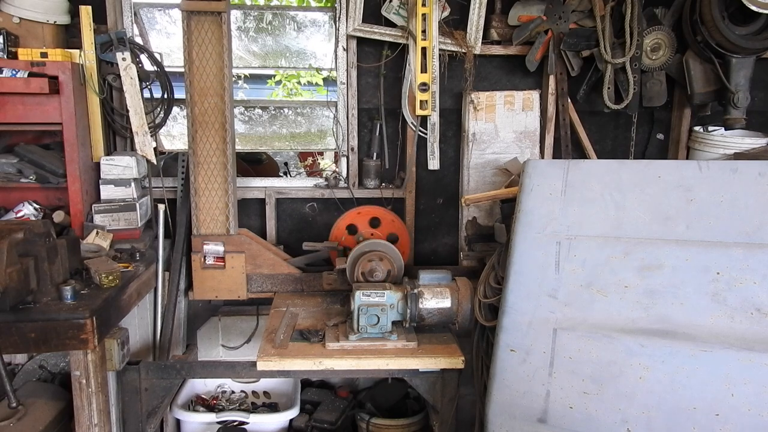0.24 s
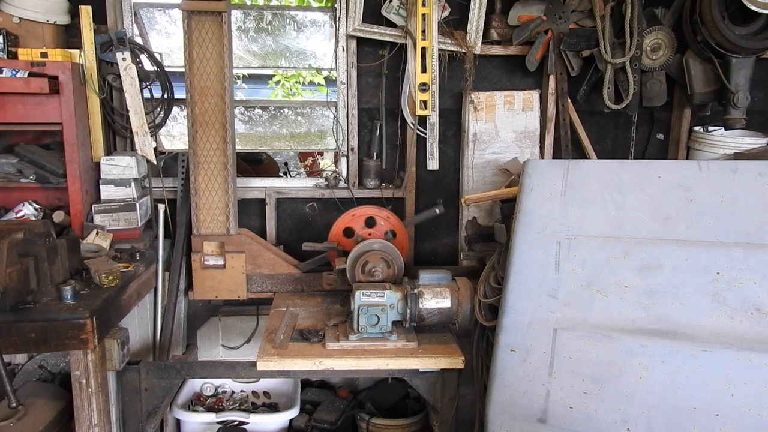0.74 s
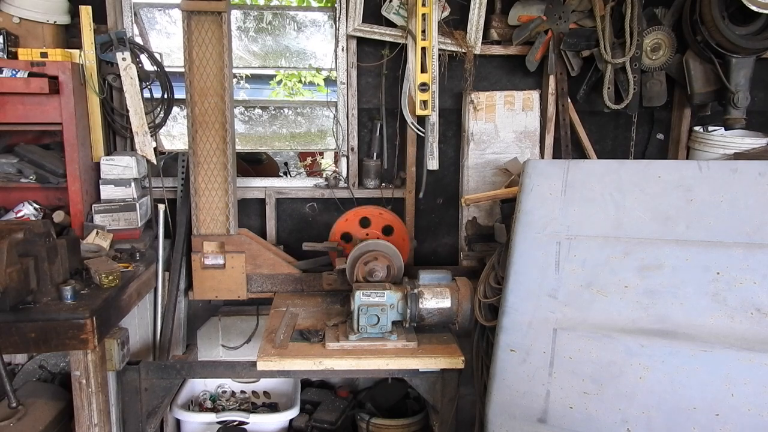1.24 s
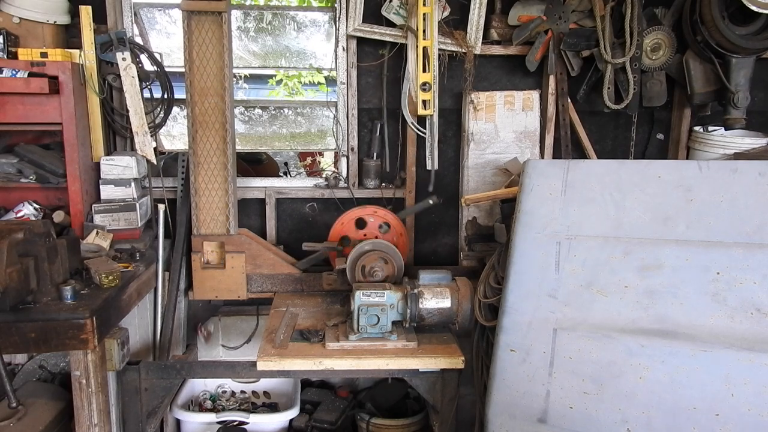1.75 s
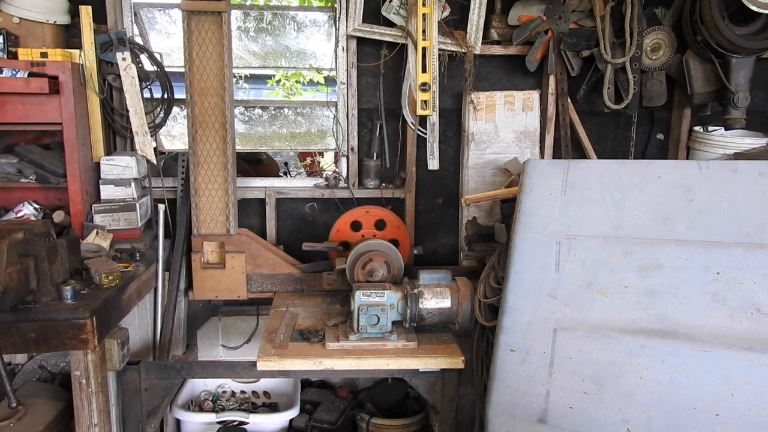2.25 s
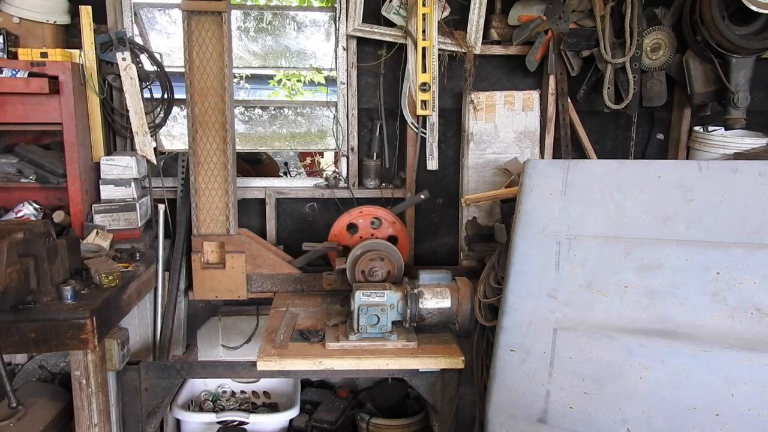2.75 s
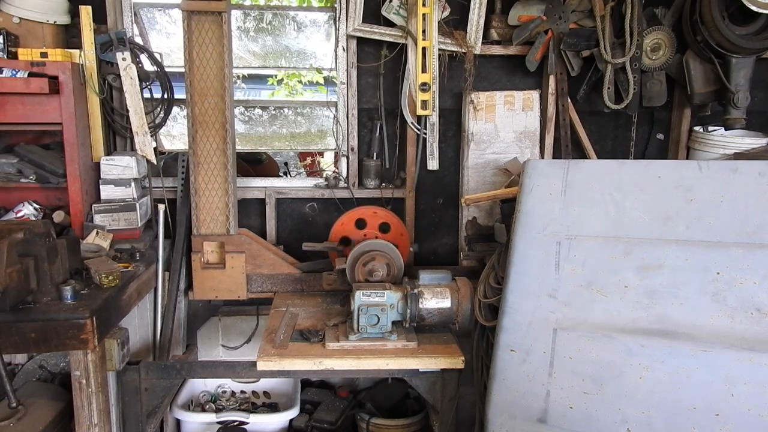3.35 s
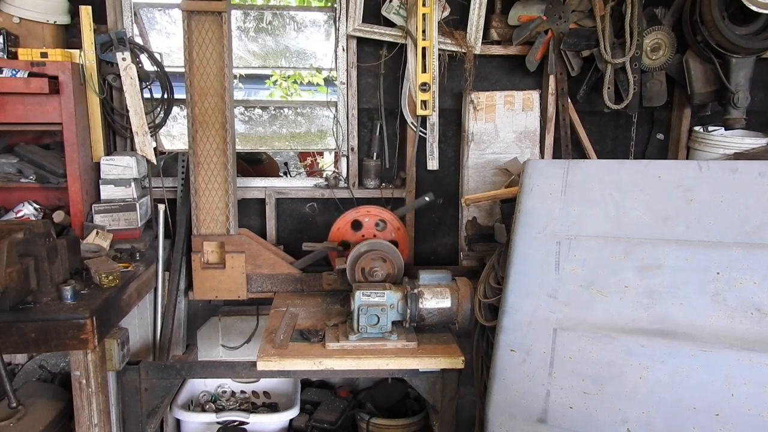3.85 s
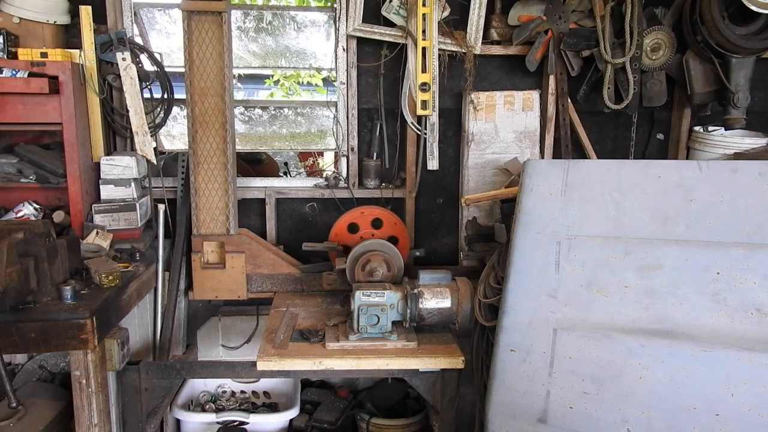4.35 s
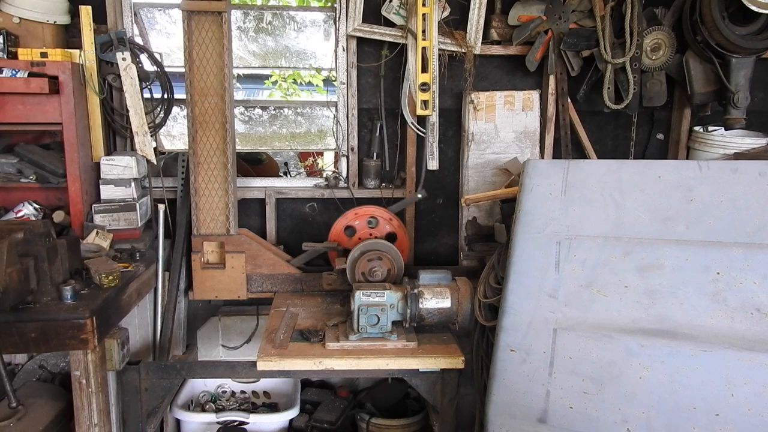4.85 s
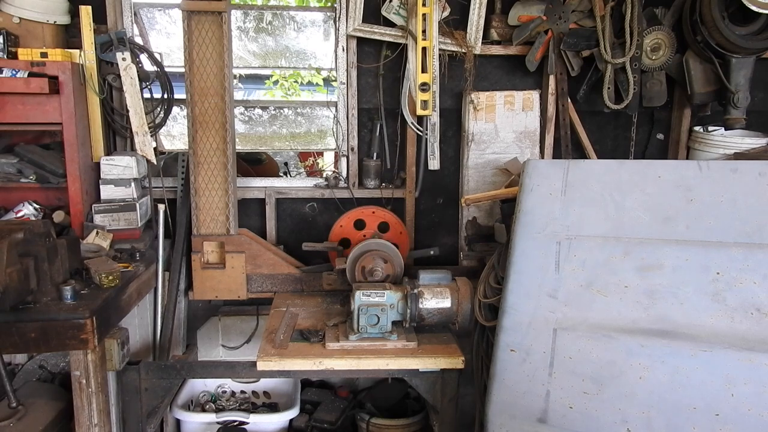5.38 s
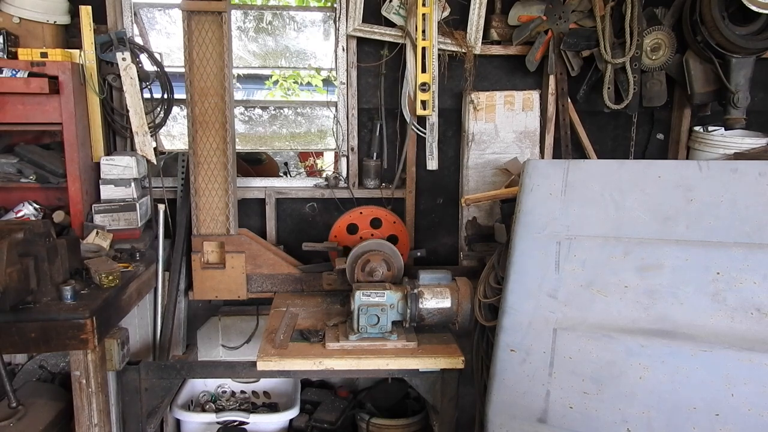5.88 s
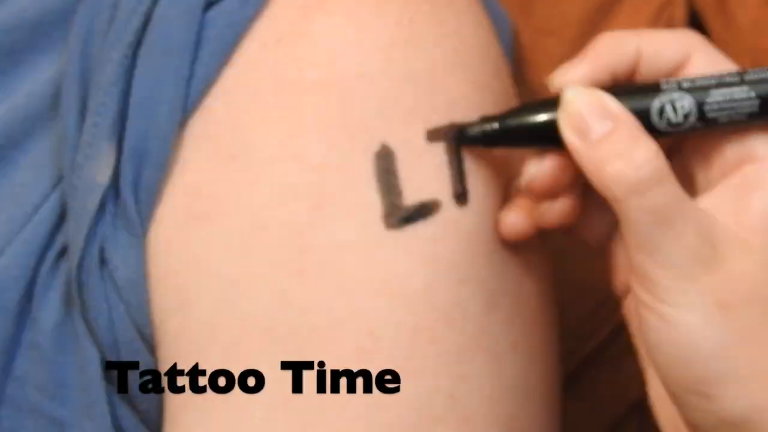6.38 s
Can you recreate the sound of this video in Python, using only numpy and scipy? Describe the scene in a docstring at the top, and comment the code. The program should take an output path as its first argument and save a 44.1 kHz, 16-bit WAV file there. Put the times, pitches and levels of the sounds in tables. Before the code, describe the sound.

Close up in a small workshop, the electric motor of a can crusher hums and whines, its gear noise rising and falling. Empty drink cans tumble down the feed chute with loud, dense knocks, rattles, squeals and a few hollow hoots. The clatter then thins to single cans crunching and dropping. The motor is cut, a last few cans clatter, and the sound fades.

```python
"""A small workshop, close to a motor-driven can crusher, heard as on a mid-side microphone pair.
From the start the motor hums and whines and the ram slides out and back, while empty drink cans tumble
down the feed chute, knocking, rattling and squealing; around 2 s the air in them hoots hollowly.
After 3 s single cans crunch and drop. At 5.1 s the motor is cut, a last few cans clatter, and at 6 s
the scene fades out. Every source has two rows, mid and side."""
import sys
import numpy as np
from scipy import signal
from scipy.fft import rfft, irfft
from scipy.io import wavfile
from scipy.ndimage import uniform_filter1d, minimum_filter1d

SR = 44100
rng = np.random.default_rng(int(sys.argv[2]) if len(sys.argv) > 2 else 0)


def log_audio(samples):
    """Write samples as a 16-bit WAV file to the path given in sys.argv[1]."""
    # one column per channel
    frames = np.atleast_2d(samples).T
    # limit to full scale, then quantise
    limited = np.clip(frames, -1, 1)
    pcm = np.round(limited * 32767).astype(np.int16)
    wavfile.write(sys.argv[1], SR, pcm)


N = 291930
TIME = np.arange(N) / SR

# reverberation of the workshop: f/Hz, t60/s
ROOM_DECAY = [(120, 0.36), (500, 0.41), (2000, 0.4), (6500, 0.31), (12000, 0.31)]
# side against mid at the microphone: f/Hz, relative level/dB
STEREO_WIDTH = [(30, -18), (60, -31.5), (125, -32), (250, -35.5), (500, -29), (1000, -17.5), (2000, -15.5),
                (4000, -11), (8000, 0), (14000, -3)]
# the treble leans to the right: f/Hz, left minus right/dB
STEREO_LEAN = [(500, 0), (1000, -0.25), (4000, -1), (8000, -.3)]
# output fader, a brief lift and then the close: t/s, gain/dB
FADER = [(5.7, -6), (5.85, -3), (5.93, -9), (5.99, -14.5), (6.01, -75), (6.1, -110)]

# spectrum of gear and belt noise: f/Hz, relative level/dB
GEAR_SPECTRUM = [(15, -51), (25, -36), (60, -19.5), (105, -6.5), (190, -7), (300, -6), (570, -5.5),
                 (850, -10), (1300, -9.5), (1500, -4.5), (1650, -16.5), (1850, -12), (2350, -17),
                 (3900, -20.5), (6700, -12), (8500, -30), (11000, -43), (16000, -62.5)]
# rotor slot tones: multiple of the shaft speed, multiple of the magnetic pull added to it, level/dB
SLOT_TONES = [(48, -2, -39.5), (48, -1, -41.5), (47, 0, -33.5), (48, 0, -33.5), (49, 0, -33.5),
              (50, 0, -39), (48, 1, -30.5), (48, 2, -44.5), (43, 0, -40)]
# hum of the motor frame: f/Hz, level/dB
FRAME_HUM = [(119.5, -40.5), (253, -44.5), (436, -45), (533, -50.5)]
SHAFT_HZ, MAGNET_HZ = 29.64, 120
CRANK_TURN_S, RAM_AT_REST_S = 1.152, 4.105  # one stroke out and back; a moment at the end of a stroke
CUT_S, FIELD_DB_PER_S = 5.1, 132.5  # the switch is thrown and the motor's field dies

# the air inside a can hoots: middle t/s, length/s, f/Hz, level/dB
AIR_HOOTS = [(1.812, 0.025, 546, -7.5), (1.879, .06, 680, -13), (1.953, 0.036, 694, -13.5),
             (1.99, .024, 714, -14.5), (2.236, .035, 733, -11), (2.294, 0.035, 710, -18),
             (2.326, 0.028, 462, -10.5), (2.969, 0.024, 542, -8.5)]
# metal rubs on metal: start t/s, end t/s, start f/Hz, end f/Hz, relative level/dB
RUB_SQUEALS = [(0, 0.028, 647, 640, -21), (0.275, 0.424, 661, 659, -18.5), (0.789, 1.028, 590, 575, -17.5),
               (0.791, 1.027, 315.6, 303.4, -21.5), (0.962, 1.135, 638, 662, -15.5),
               (1.381, 1.557, 631, 565, -21), (1.414, 1.53, 1193, 1174, -24),
               (1.416, 1.533, 5410, 5910, -13.5)]
# a wall or lid rings on one note: t/s, f/Hz, relative level/dB, t60/s
WALL_RINGS = [(0.08, 442, -8.5, 0.11), (0.1, 2550, -14.5, 0.55), (0.479, 170, -13, 0.37),
              (0.626, 245, -15.5, 0.34), (1.413, 431.4, -14, 0.22), (1.574, 5700, -13, 0.15),
              (1.605, 295, -14, 0.21), (1.721, 1025, -14.5, 0.1), (1.85, 5706, -9, .1),
              (1.856, 1716, -17, 0.37), (1.873, 3230, -13.5, 0.22), (2.01, 1283, -14, 0.32),
              (2.088, 1800, -16, 0.2), (2.225, 445, -13.5, 0.083), (2.316, 467, -15.5, 0.074),
              (2.412, 1353, -10, .15), (2.68, 247, -17, 0.3), (2.685, 539, -14, 0.19),
              (2.688, 1325, -13, 0.14), (2.901, 6660, -11, 0.19), (4.172, 6220, -11, 0.17),
              (4.174, 1860, -13, 0.081), (5.188, 1851, -27.5, 0.13), (5.26, 1875, -21, 0.17),
              (5.262, 6440, -10, 0.17), (5.413, 6460, -20, .1), (5.579, 4420, -17, 0.15)]
# a dent pops through: t/s, f/Hz, relative level/dB
DENT_POPS = [(0.0812, 624, -1), (0.0946, 2800, -9), (0.0982, 800, -5), (0.1004, 3350, -0.5),
             (1.112, 4200, -4.5), (1.1603, 880, -3.5), (1.1705, 1300, -6.5), (1.603, 1300, -1),
             (1.643, 1200, -9.5), (1.6947, 900, 1), (2.01, 6420, -5), (2.197, 6200, -4.5),
             (2.611, 6060, 5.5), (2.699, 1300, -4.5), (3.1892, 910, 3), (3.1948, 6600, -6),
             (3.315, 6400, 1.5), (3.349, 5500, -8.5)]
# spectrum of the clatter: f/Hz, relative level/dB
CLATTER_SPECTRUM = [(29, -53), (50, -36.5), (131, -12.5), (284, 2), (483, -2.5), (532, 1), (765, 0),
                    (1210, 2.5), (1820, -2), (2380, -10), (3580, -7), (3950, -12.5), (6390, -9.5),
                    (7210, -11), (16000, -55)]
# resonances of chute and cans: f/Hz, width/Hz, lift/dB
CAN_RESONANCES = [(164, 15.1, 10), (245.5, 14, 0.5), (299.4, 38, 2), (423, 28, 4), (532, 40, 4),
                  (656, 47, 6.5), (1060, 19, 3.5), (1219, 75, 1.5), (2050, 51, 0), (3176, 70, -5),
                  (5670, 98, 1), (6464, 1200, 5)]
REGISTER_EDGES_HZ = [400, 2200, 4800]  # between thud, clank, crack and jingle
# a can tumbles or crumples: start t/s, swell/s, hold/s, chute thud/dB, wall clank/dB, rim jingle/dB
CAN_CRUNCHES = [(0.091, 0.028, 0.19, -22.5, -12.5, -11), (0.45, 0.044, 0.12, -17.5, -12.5, -16),
                (0.773, 0.0082, 0.22, -27.5, -13.5, -15.5), (1.149, 0.0087, 0.29, -25, -14.5, -13),
                (1.553, 0.04, .15, -20.5, -13, -17.5), (1.849, .01, 0.16, -40.5, -22, -21),
                (2.01, 0.028, 0.086, -25.5, -14.5, -17), (2.188, 0.0067, 0.12, -30.5, -14.5, -13.5),
                (2.337, 0.0092, 0.12, -37.5, -16.5, -14.5), (2.602, 0.054, 0.14, -23, -12, -18.5),
                (3.104, .01, 0.019, -21.5, -23.5, -21.5), (3.194, .01, .045, -31.5, -18.5, -16),
                (3.308, .01, 0.087, -36, -24.5, -19), (3.604, 0.078, 0.0041, -21.5, -12.5, -20),
                (4.149, 0.029, 0.004, -18.5, -17, -15), (4.681, 0.056, 0.0067, -21.5, -14.5, -23.5),
                (4.848, 0.041, 0.058, -38, -29, -33.5), (5.175, .02, 0.051, -33, -35, -38.5),
                (5.251, .01, .005, -31.5, -26, -20.5), (5.415, 0.019, 0.12, -38.5, -37.5, -39),
                (5.544, 0.058, 0.011, -22, -16.5, -14.5)]
# single knocks of a can: t/s, wall clank/dB, crack/dB, rim jingle/dB, t60/s
CAN_KNOCKS = [(0.079, -9, -26.5, -11.5, .07), (0.091, -6, -5, -11, .05), (0.428, -19, -47, -17.5, .14),
              (0.475, -6.5, -25, -2, 0.071), (0.606, -9, -16, -23.5, .14), (0.783, -12, -17, -2.5, .07),
              (1.11, -23.5, -17.5, -12.5, .08), (1.158, -2, -15.5, -14.5, .09),
              (1.394, -15, -28.5, -19, .12), (1.407, -12, -30, -8, .08), (1.546, -18, -22.5, -6.5, 0.15),
              (1.576, -30, -18, -9.5, .06), (1.602, -6.5, -11.5, -22, .07), (1.641, -9, -13, -20, .08),
              (1.691, -9, -7.5, -22, .09), (1.848, -22, -6.5, -4, .09), (2.006, -14.5, -14, -8, .12),
              (2.192, -13, -16, -8.5, .1), (2.229, -4.5, -16.5, -9, 0.044), (2.329, -12, -18.5, -11, .09),
              (2.403, -9.5, -8, -21.5, .05), (2.491, -18.5, -18.5, -11.5, .09),
              (2.611, -9.5, -17, -1.5, .08), (2.642, -13.5, -28, -10, .1), (2.696, -8.5, -16.5, -20, .08),
              (2.76, -7.5, -10, -25, .14), (2.895, -23, -13.5, -11, .11), (3.061, -24.5, -27, -28, .14),
              (3.112, -14.5, -32, -25.5, .07), (3.134, -24, -25, -15, .16), (3.188, -8.5, -12.5, -3, .045),
              (3.312, -31.5, -17, -8.5, .07), (3.347, -30, -22.5, -18.5, .07),
              (3.692, -9.5, -12.5, -11.5, .12), (3.974, -13.5, -23, -38, 0.13),
              (4.124, -24.5, -28.5, -22.5, .17), (4.161, -23, -32.5, -18, .12),
              (4.181, -11.5, -25.5, -11, .12), (4.694, -24.5, -33.5, -16, .1), (4.717, -20, -30, -9, 0.059),
              (4.75, -8.5, -22.5, -23.5, .09), (4.926, -12.5, -20, -25, .12), (5.039, -31, -50, -19, 0.052),
              (5.171, -42, -28.5, -25, 0.046), (5.19, -25, -32.5, -34, 0.19),
              (5.26, -15.5, -26.5, -6, 0.071), (5.412, -40, -55, -29.5, .09), (5.585, -34, -37, -16.5, .2),
              (5.622, -8, -13, -25, .07), (5.821, -34, -32, -38.5, .11)]


def amp(db):
    """Decibels to gain."""
    return 10 ** (np.asarray(db) / 20)


def unit_rms(x):
    """Scaled to rms 1."""
    return x / np.sqrt(np.mean(x ** 2) + 1e-20)


def read(points, hz):
    """A table's value on a log-frequency axis."""
    f, value = np.transpose(points)
    return np.interp(np.log(hz + 1), np.log(f + 1), value)


def add(mix, s, sound):
    """Mixes a sound in at time s."""
    part = mix[:, max(round(s * SR), 0):][:, :sound.shape[1]]
    part += sound[:, :part.shape[1]]


def wander(rate_hz):
    """Slow random motion of rms 1."""
    hz = np.fft.rfftfreq(N, 1 / SR)
    return unit_rms(irfft(rfft(rng.standard_normal(N)) * np.exp(-(hz / rate_hz) ** 2), N))


def causal(gain, size=4096):
    """The minimum-phase response with this spectral shape, of energy 1."""
    log_gain = np.log(np.maximum(np.r_[gain, gain[-2:0:-1]] / gain.max(), 1e-5))
    taps = np.fft.ifft(np.exp(np.conj(signal.hilbert(log_gain)))).real[:size]
    return taps / np.linalg.norm(taps)


def through(x, taps):
    """Convolves each channel, keeping the length."""
    return signal.fftconvolve(x, np.atleast_2d(taps), axes=1)[:, :x.shape[1]]


def workshop(x, gap_s=0.0035):
    """Dense reflections from near, cluttered walls, each band dying at its own speed."""
    hz, t, bands = signal.stft(rng.standard_normal((2, SR // 2)), SR, nperseg=256)
    tail = signal.istft(bands * amp(-60 * t / read(ROOM_DECAY, hz)[:, None]), SR, nperseg=256)[1]
    tail *= np.clip(np.arange(tail.shape[1]) / SR / gap_s - 1, 0, 1)
    return through(x[[0, 0]], tail / np.linalg.norm(tail[0]))


def motor_drive():
    """1 while the motor is powered, falling to 0 after the cut."""
    return amp(-FIELD_DB_PER_S * np.maximum(TIME - CUT_S, 0))


def gears(rest_db=-28.5, slide_db=6.5, throb=0.17, flutter_db=0.1, unpowered_db=-8, coast_db_per_s=-5):
    """Gear teeth and belt rub, harder once a turn; loudest while the ram slides fastest."""
    ram_speed = abs(np.sin(2 * np.pi * (TIME - RAM_AT_REST_S) / CRANK_TURN_S))
    coasting_db = unpowered_db * (1 - motor_drive()) + coast_db_per_s * np.maximum(TIME - CUT_S, 0)
    rub = rng.standard_normal((2, N)) * (1 + throb * np.cos(2 * np.pi * SHAFT_HZ * TIME))
    rub *= amp(flutter_db * wander(32))
    colour = causal(amp(read(GEAR_SPECTRUM, np.fft.rfftfreq(8192, 1 / SR))))
    return amp(rest_db + slide_db * ram_speed + coasting_db) * unit_rms(through(rub, colour))


def motor(drift_hz=0.011, whine_waver_db=2, hum_waver_db=5, coast_hz=105, coast_db=-48):
    """Rotor slots whine in a cluster that beats once a turn; the frame hums, lower after the cut."""
    drive = motor_drive()
    turns = np.cumsum(SHAFT_HZ + drift_hz * wander(0.91)) / SR
    whine = hum = 0
    for per_turn, per_pull, db in SLOT_TONES:
        cycles = per_turn * turns + per_pull * MAGNET_HZ * TIME
        whine += amp(db + whine_waver_db * wander(6.3)) * np.cos(2 * np.pi * cycles)
    for hz, db in FRAME_HUM:
        hum += amp(db + hum_waver_db * wander(11)) * np.sin(2 * np.pi * hz * TIME + 0.55 * wander(9.3))
    coast = amp(coast_db + 3 * wander(9)) * np.sin(2 * np.pi * coast_hz * TIME + 0.63 * wander(6))
    return np.sqrt(2) * np.outer([1, .5], drive * (whine + hum) + (1 - drive) * coast)


def hoots():
    """The air in a can rings briefly through its opening, dead centre."""
    out = np.zeros((2, N))
    for s, length, hz, db in AIR_HOOTS:
        t = np.arange(0, length, 1 / SR)
        swell = amp(db) * np.sqrt(2) * np.sin(np.pi * t / length) ** 2
        add(out, s - length / 2, np.outer([1, 0], swell * np.sin(2 * np.pi * hz * t)))
    return out


def squeals(gain_db=-1, jitter=0.026, rough_db=4):
    """Uneven slipping keeps one resonance sounding, with a shaky pitch."""
    out, shake, grip = np.zeros((2, N)), wander(90), wander(60)
    for start, end, hz_from, hz_to, db in RUB_SQUEALS:
        on = (TIME >= start) & (TIME < end)
        cycles = np.cumsum(np.linspace(hz_from, hz_to, on.sum()) * (1 + jitter * shake[on])) / SR
        level = amp(gain_db + db + rough_db * grip[on]) * signal.windows.tukey(on.sum(), .4)
        out[:, on] += level * np.sin(2 * np.pi * (cycles + rng.random((2, 1))))
    return out


def rings(gain_db=3, split=0.015, rise_s=0.0013, flex=0.01014):
    """A dented can splits each note into a close pair that beats as it dies; flexing shakes the pitch."""
    out, t, shake = np.zeros((2, N)), np.arange(SR // 3) / SR, wander(70)
    for s, hz, db, t60 in WALL_RINGS:
        phase = rng.random((2, 2, 1))
        cycles = np.cumsum(hz * (1 + flex * np.interp(s + t, TIME, shake))) / SR
        lower = np.sin(2 * np.pi * (cycles + phase[0]))
        upper = .5 * np.sin(2 * np.pi * ((1 + split) * cycles + phase[1]))
        add(out, s, amp(gain_db + db - 60 * t / t60) * (1 - np.exp(-t / rise_s)) * (lower + upper))
    return out


def pops(cycles=0.75, least_s=0.00081):
    """Thin metal flips from one shape to the other in one short, hard swing."""
    out, t = np.zeros((2, N)), np.arange(-256, 256) / SR
    for s, hz, db in DENT_POPS:
        width = max(cycles / hz / 2, least_s)
        swing = np.sin(2 * np.pi * (hz * t + rng.random((2, 1))))
        add(out, s + t[0], amp(db) * np.exp(-abs(t) / width) * swing)
    return out


def can_registers(order=12):
    """Responses of the four registers of a can in the chute: thud, clank, crack, jingle."""
    hz = np.fft.rfftfreq(8192, 1 / SR)
    lift_db = sum(db / (1 + (2 * (hz - f) / width) ** 2) for f, width, db in CAN_RESONANCES)
    colour = amp(read(CLATTER_SPECTRUM, hz) + lift_db)
    below = [0 * hz] + [1 / (1 + (hz / edge) ** order) for edge in REGISTER_EDGES_HZ] + [0 * hz + 1]
    return [causal(colour * np.sqrt(abs(share))) for share in np.diff(below, axis=0)]


def thin_metal(size, spacing_hz, hump_db=4):
    """Dense modes of thin metal: noise whose spectrum has random humps."""
    hz, grid = np.fft.rfftfreq(size, 1 / SR), np.arange(0, SR, spacing_hz)
    humps = np.interp(hz, grid, rng.standard_normal(SR // 32)[:len(grid)])
    spectrum = rfft(rng.standard_normal((2, size))) * amp(hump_db * np.clip(humps, -2, 2))
    return unit_rms(irfft(spectrum, size))


def rattle(per_s=420, spread_db=2.5, ring_t60=0.087, snap=2.36, snap_t60=0.0029, count=30, size=4096):
    """Endless small contacts; each spot of thin metal answers with a snap and its own ring."""
    out, t = np.zeros((2, N)), np.arange(size) / SR
    contacts = (rng.random(N) < per_s / SR) * amp(spread_db * np.minimum(rng.exponential(1, N), 3.5))
    spot_hit = rng.integers(0, count, N)
    decay = amp(-60 * t / ring_t60) + snap * amp(-60 * t / snap_t60)
    spots = [thin_metal(size, spacing_hz=110) * decay for _ in range(count)]
    for at in np.flatnonzero(contacts):
        add(out, at / SR, contacts[at] * spots[spot_hit[at]])
    return out


def turning(x, shift_db=3.5):
    """As cans turn and buckle, their resonances come and go."""
    bands = signal.stft(x, nperseg=512, noverlap=384)[2]
    patches = uniform_filter1d(rng.standard_normal(bands.shape[1:]), size=3, axis=0)  # over frequency
    patches = unit_rms(uniform_filter1d(patches, size=18, axis=1))  # over time
    return signal.istft(bands * amp(shift_db * patches), nperseg=512, noverlap=384)[1][:, :N]


def crunch_force(t, swell, hold, settle_s=0.23, settle_per_hold=0.82):
    """One crunch swells, holds and settles; the longer it holds, the slower it settles."""
    settling = np.maximum(t - swell - hold, 0) / (settle_s + settle_per_hold * hold)
    return np.clip(t / swell, 0, 1) ** 2 * amp(-60 * settling)


def tumbles(registers, body_lag_s=0.013, rim_sag_db_per_s=4, crack_db=-2.5, buckle_db=1.7, buckle_hz=22):
    """Cans bounce down the chute or crumple: the rattle swells, rims first, and surges as walls buckle."""
    metal, force, t = turning(rattle()), np.zeros((4, N)), np.arange(SR) / SR
    for start, swell, hold, thud, clank, jingle in CAN_CRUNCHES:
        body = crunch_force(t - body_lag_s, swell, hold)
        rims = crunch_force(t, swell, hold) * amp(jingle - rim_sag_db_per_s * t)
        walls = amp(clank) * body
        crack = amp(crack_db) * np.sqrt(walls * rims)
        add(force, start, np.array([amp(thud) * body, walls, crack, rims]))
    out = np.zeros((2, N))
    for register, gain in zip(registers, force * amp(buckle_db * wander(buckle_hz))):
        sound = through(metal, register)
        running_rms = np.sqrt(abs(uniform_filter1d(sound[0] ** 2, size=1800)) + 1e-12)
        out += gain * sound / running_rms  # steadied, then swelled by its own force
    return out


def knocks(registers, rise_share=0.048, thud_db=-12, snap=0.46, snap_t60=0.0083, size=8192):
    """The thin wall yields over a few milliseconds and snaps, then the can's dense modes die away."""
    out, t = np.zeros((2, N)), np.arange(size) / SR
    for s, clank, crack, jingle, t60 in CAN_KNOCKS:
        rise_s = rise_share * t60  # a slack wall is slow both to yield and to ring out
        after = np.maximum(t - rise_s, 0)
        decay = amp(-60 * after / t60) + snap * amp(-60 * after / snap_t60)
        strike = thin_metal(size, spacing_hz=130) * np.minimum(t / rise_s, 1) * decay
        gains = amp([clank + thud_db, clank, crack, jingle])
        add(out, s, through(strike, gains @ np.array(registers)))
    return out


def scene(tumble_room_db=-8, knock_room_db=-5, side_db=-2.5, pop_db=1):
    """Cans in front, machine beneath, decoded to left and right: wide treble, central bass."""
    registers, hz = can_registers(), np.fft.rfftfreq(N, 1 / SR)
    rolling = tumbles(registers) + squeals() + rings() + hoots()
    struck = knocks(registers) + amp(pop_db) * pops()
    room = workshop(amp(tumble_room_db) * rolling + amp(knock_room_db) * struck)
    mid, side = rfft(rolling + struck + room + motor() + gears())
    side *= amp(side_db + read(STEREO_WIDTH, hz))
    lean = amp(read(STEREO_LEAN, hz) / 2)
    return irfft(np.array([(mid + side) * lean, (mid - side) / lean]), N)


def record(dry, headroom_db=15.8, window=48, edge_hz=16300):
    """A fast limiter holds the peaks a set headroom over the rms level; then fader and low-pass."""
    ceiling = amp(headroom_db) * dry.std()
    allowed = ceiling / np.maximum(abs(dry).max(0), ceiling)
    limited = dry * uniform_filter1d(minimum_filter1d(allowed, window), window)
    faded = limited * amp(np.interp(TIME, *np.transpose(FADER)))
    low_pass = signal.firwin(511, edge_hz, window=("kaiser", 9), fs=SR)
    return signal.oaconvolve(faded, low_pass[None], "same")


dry = scene()
out = record(dry)
log_audio(out)
```